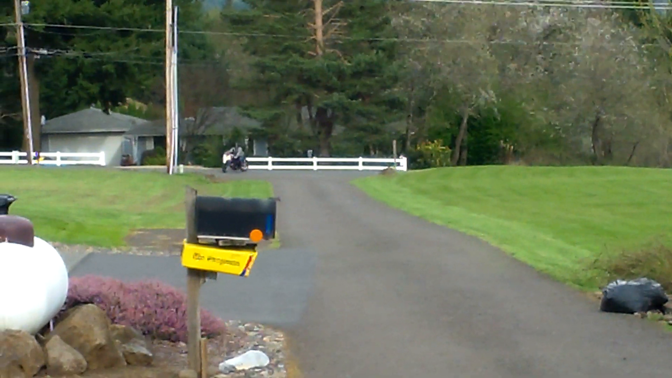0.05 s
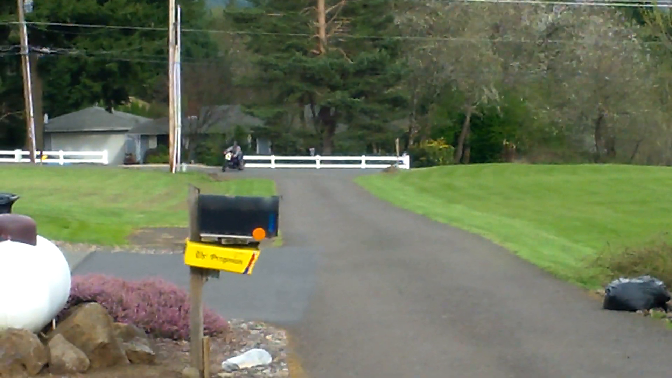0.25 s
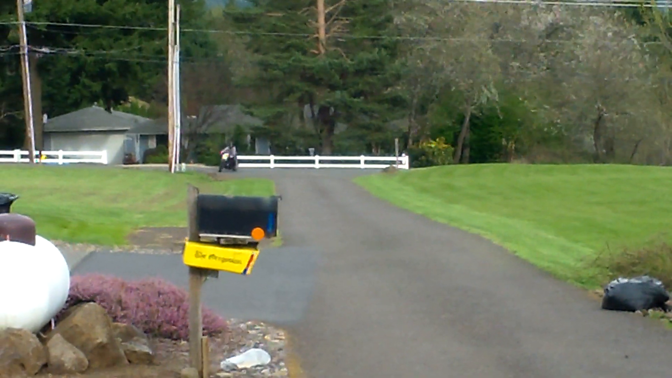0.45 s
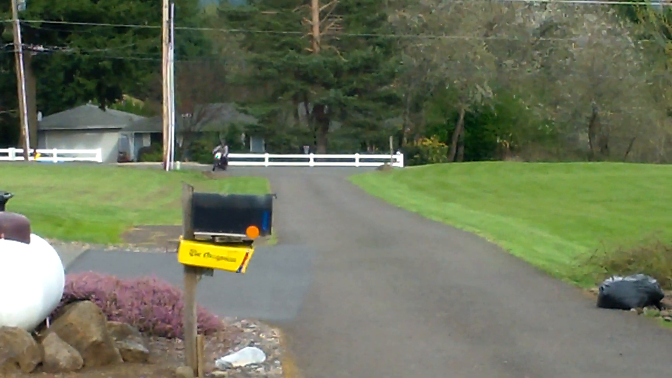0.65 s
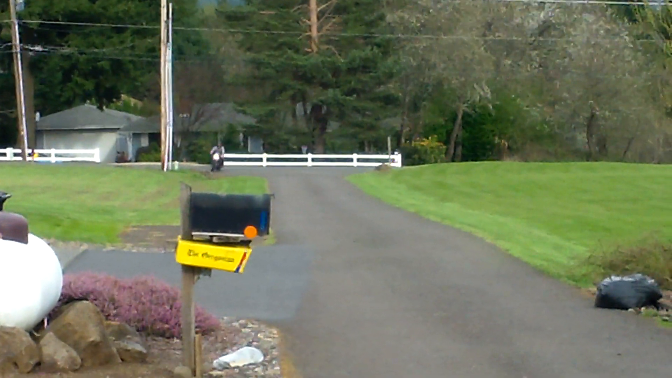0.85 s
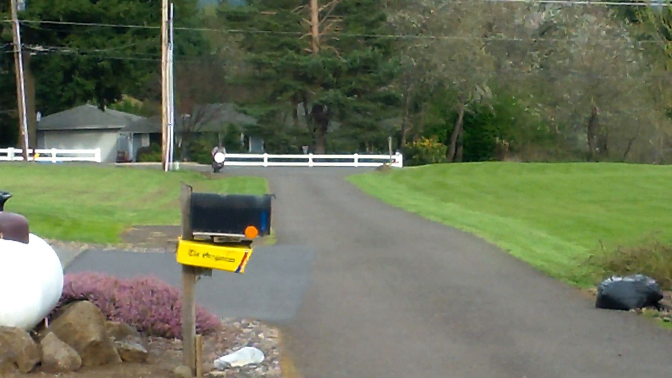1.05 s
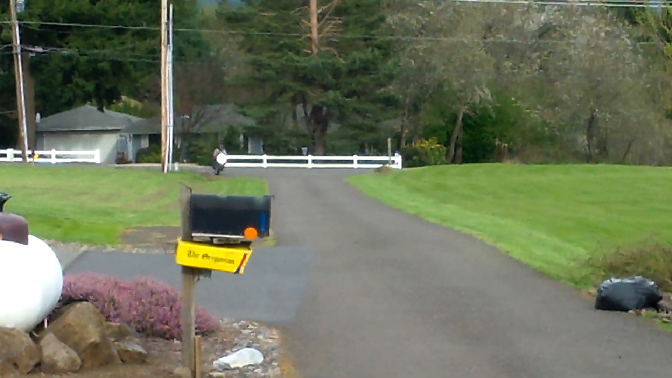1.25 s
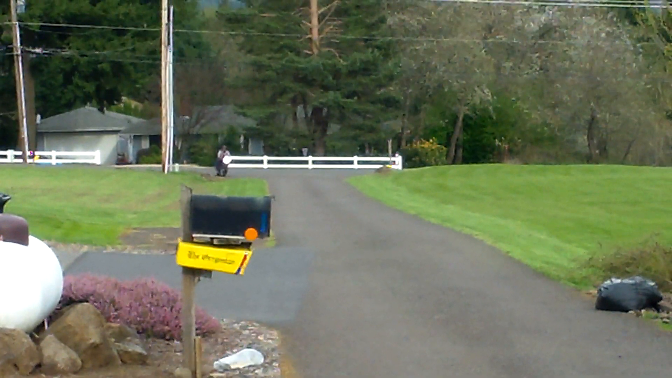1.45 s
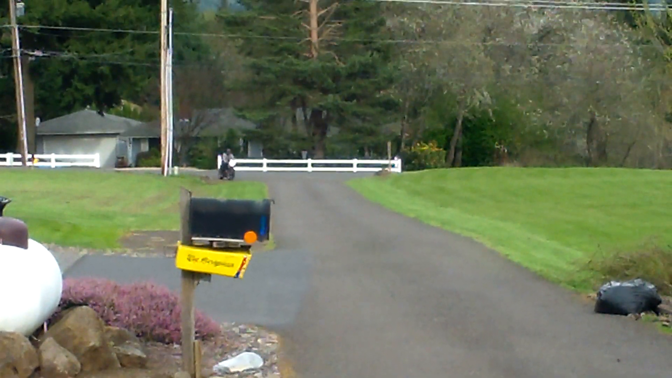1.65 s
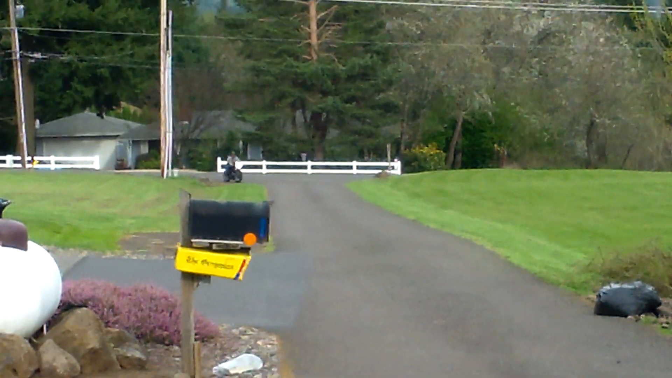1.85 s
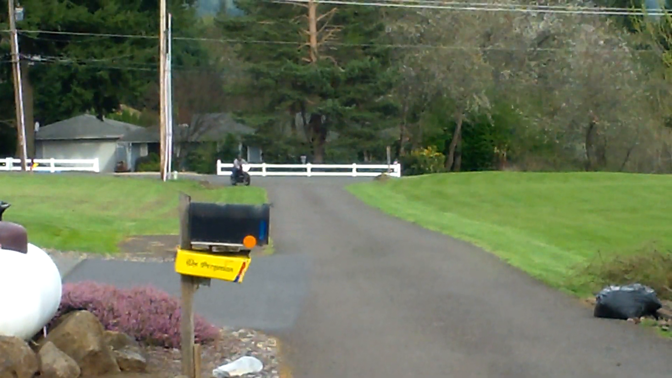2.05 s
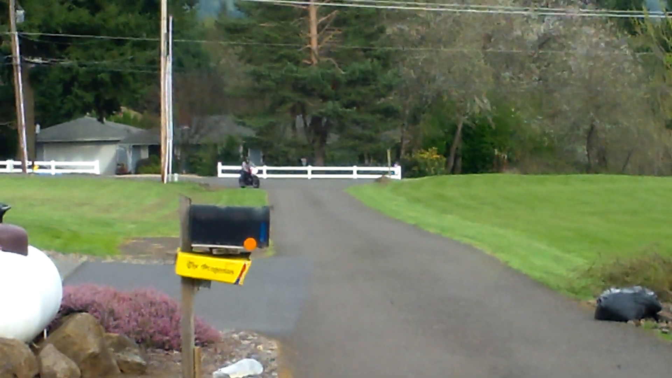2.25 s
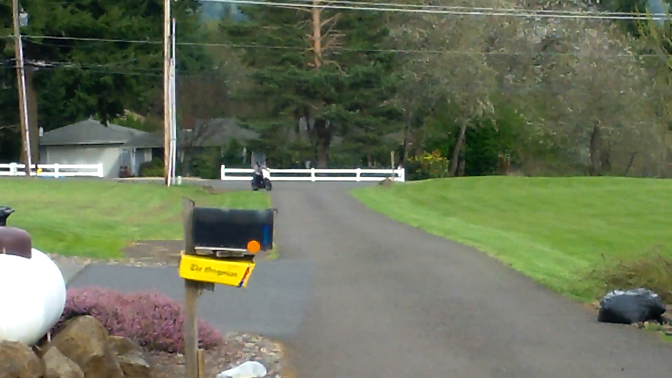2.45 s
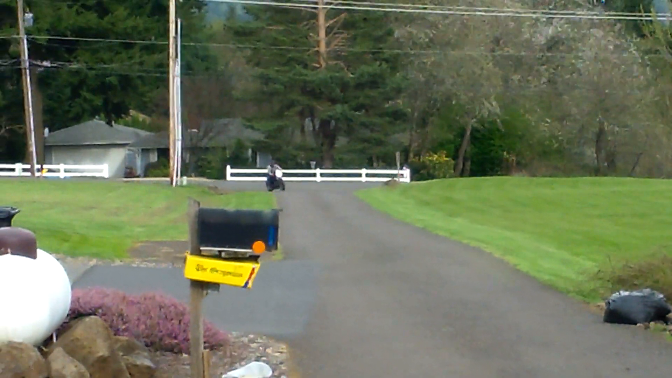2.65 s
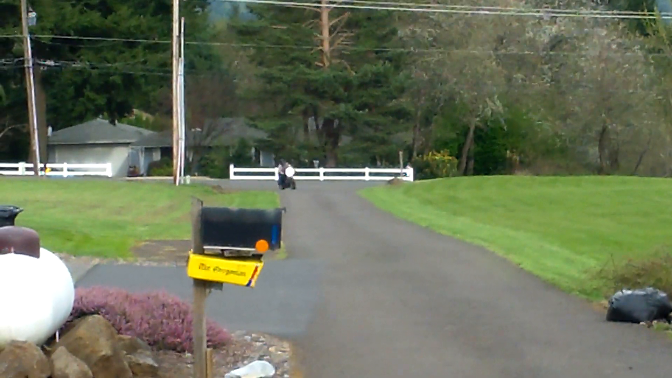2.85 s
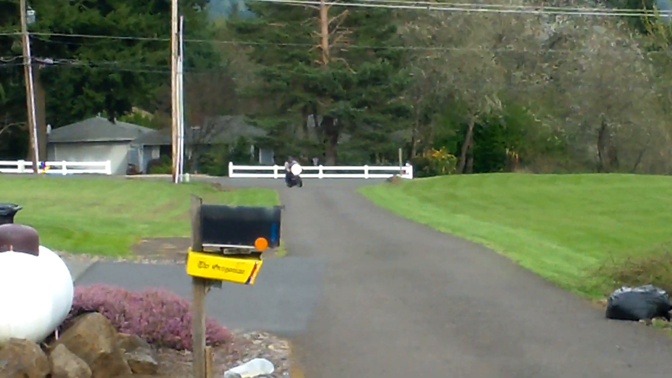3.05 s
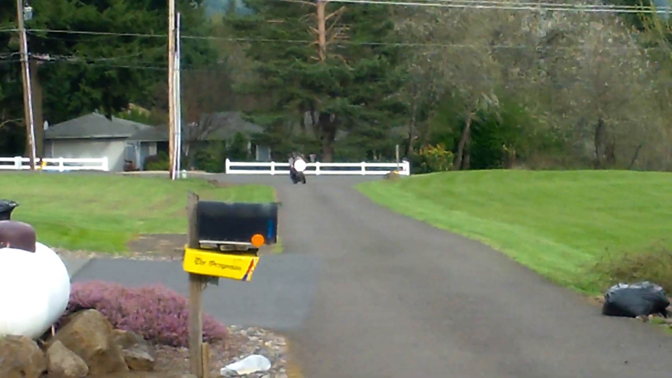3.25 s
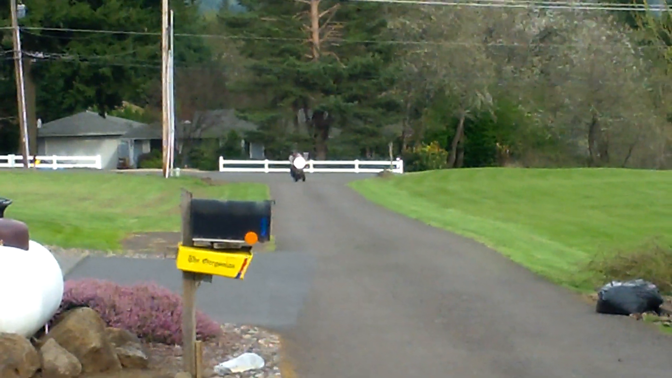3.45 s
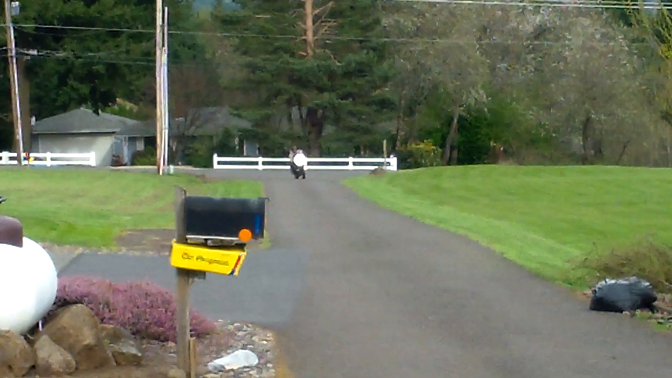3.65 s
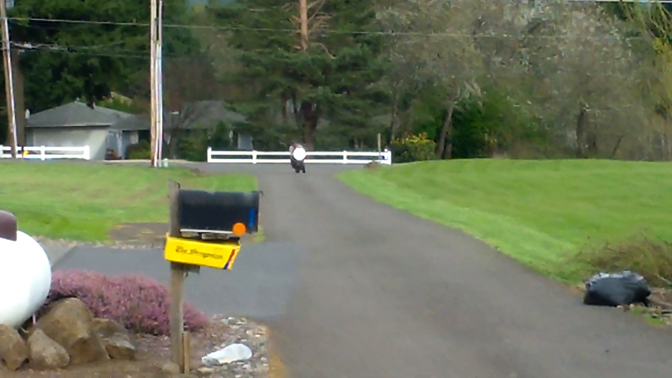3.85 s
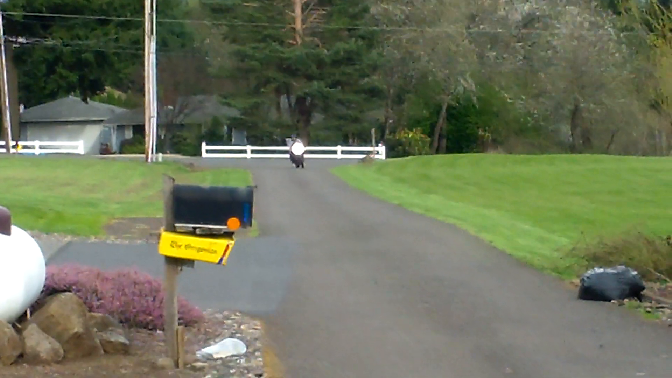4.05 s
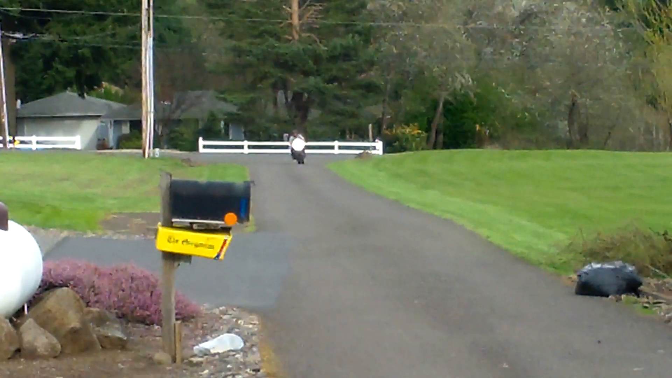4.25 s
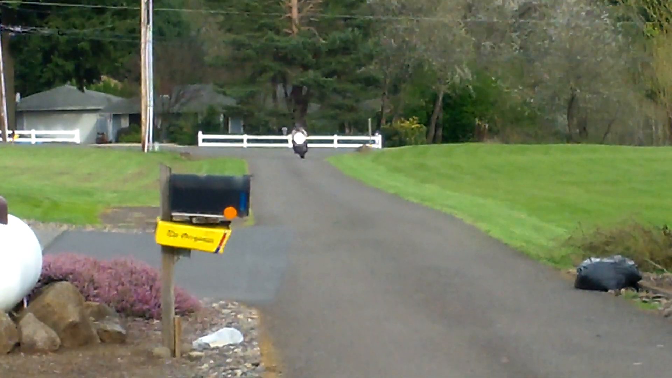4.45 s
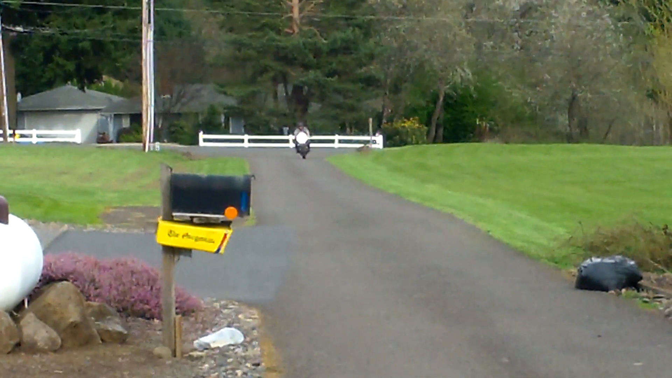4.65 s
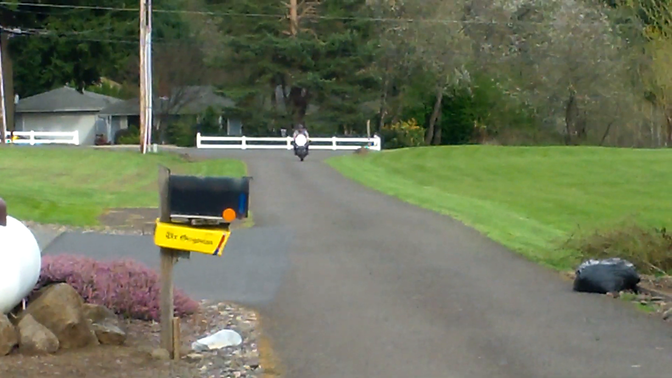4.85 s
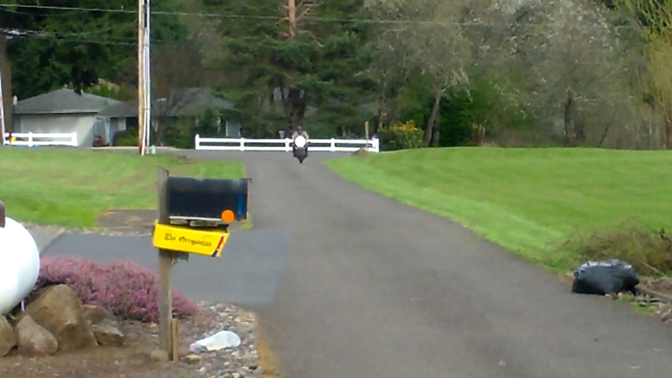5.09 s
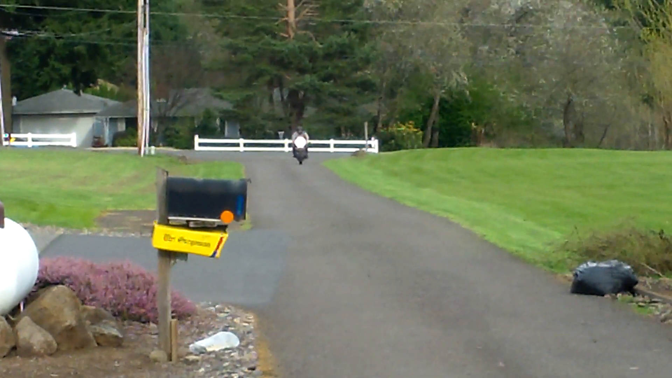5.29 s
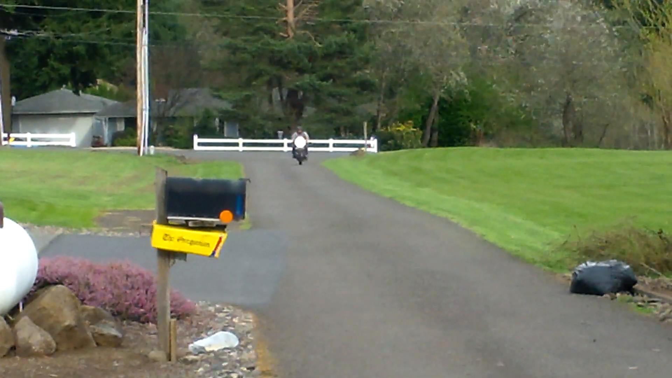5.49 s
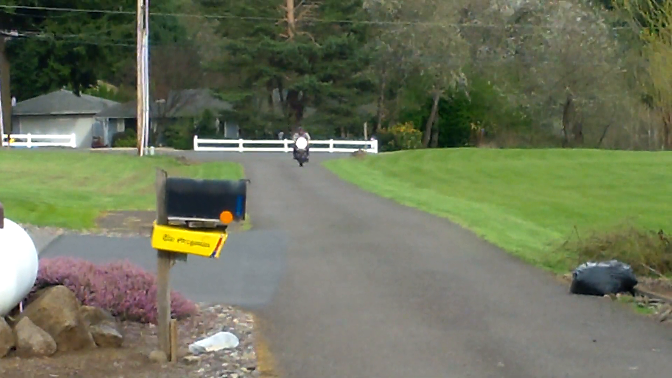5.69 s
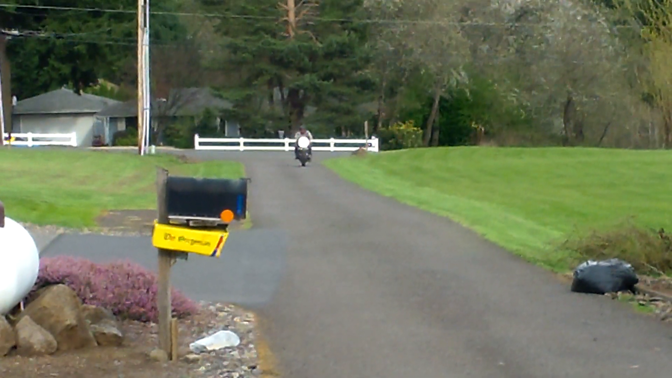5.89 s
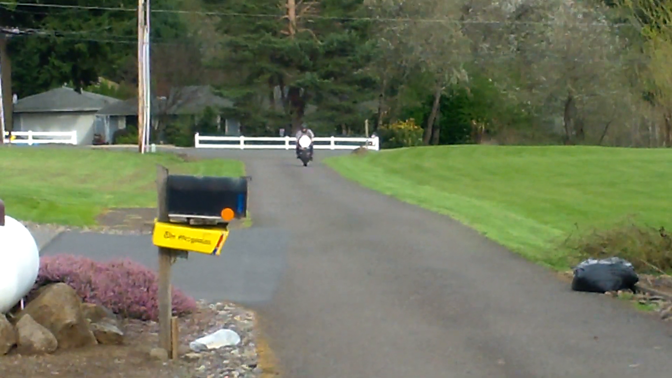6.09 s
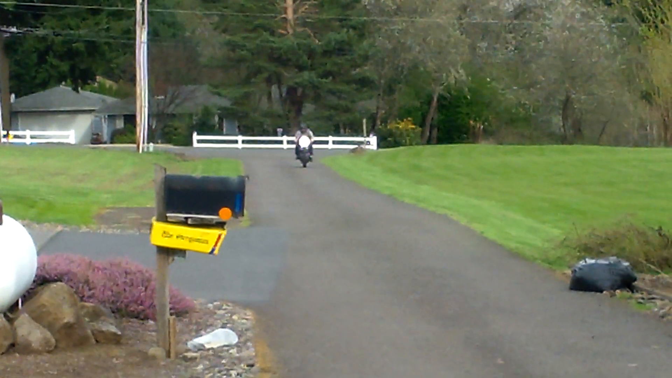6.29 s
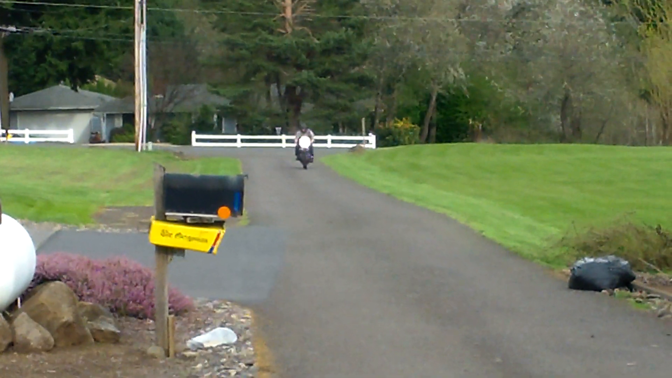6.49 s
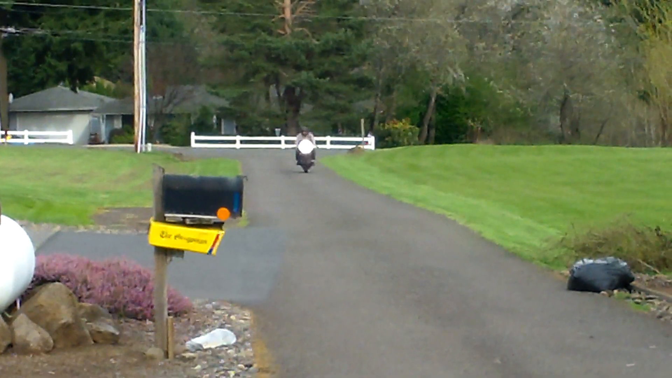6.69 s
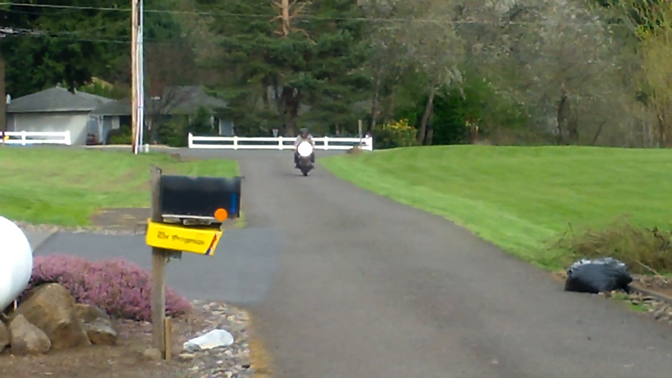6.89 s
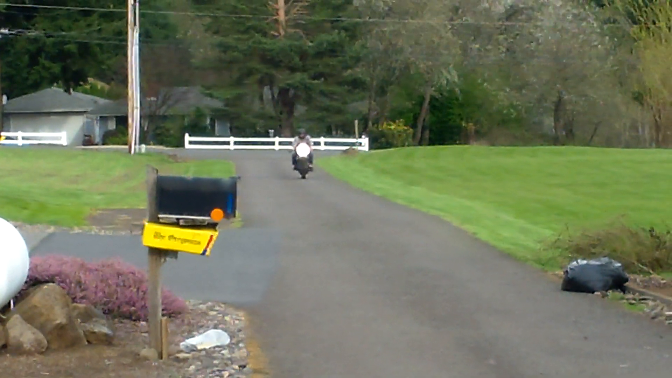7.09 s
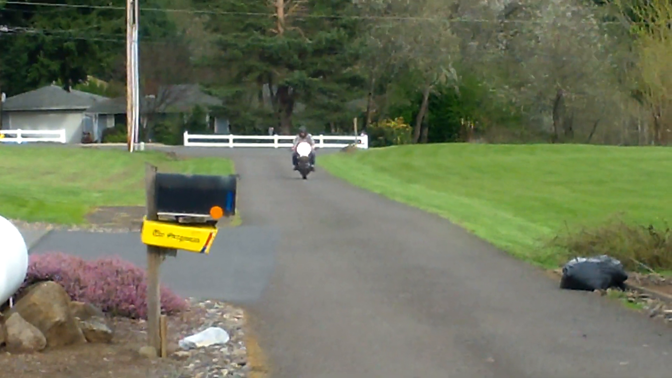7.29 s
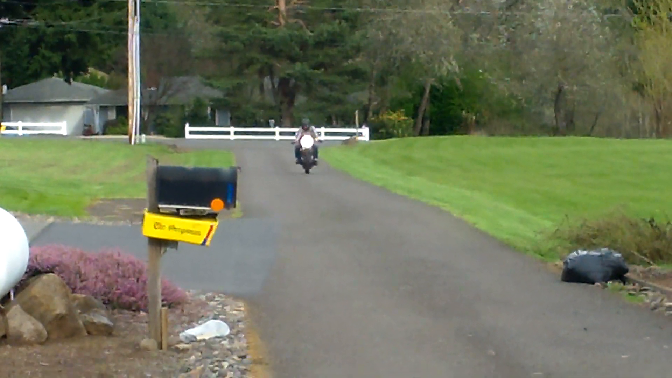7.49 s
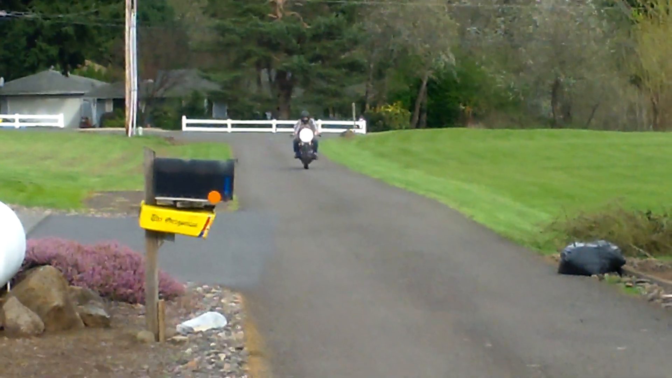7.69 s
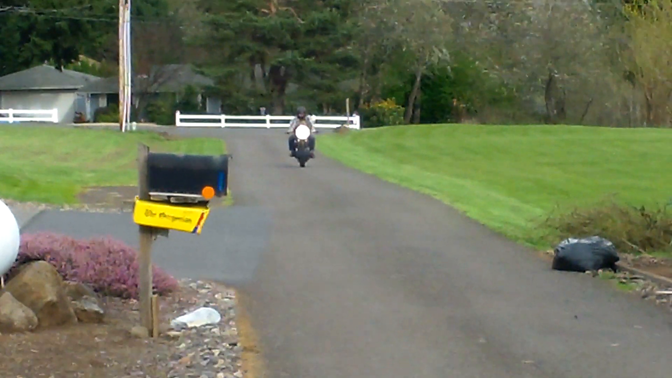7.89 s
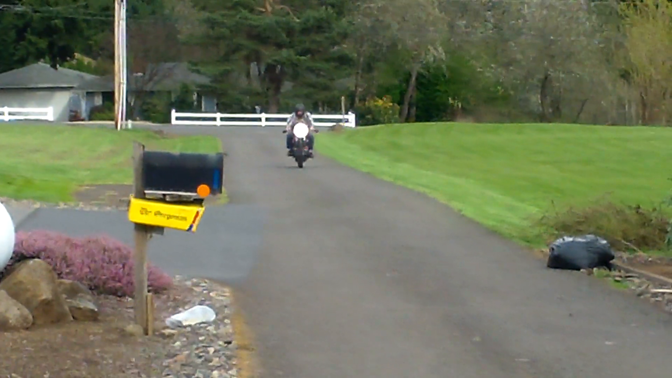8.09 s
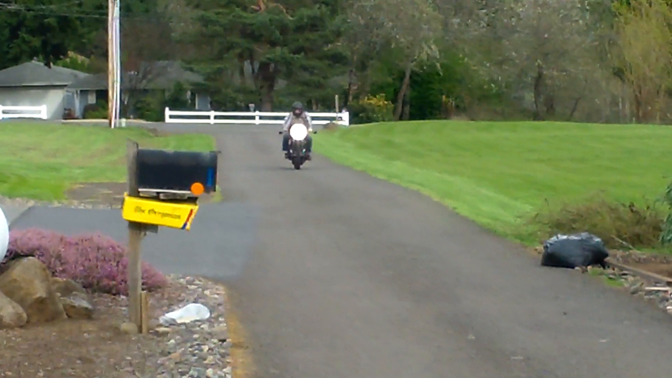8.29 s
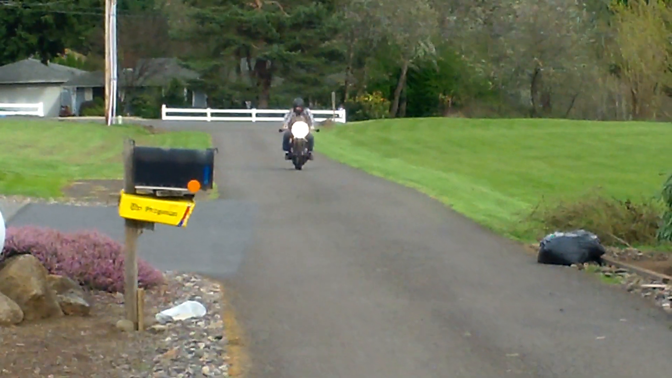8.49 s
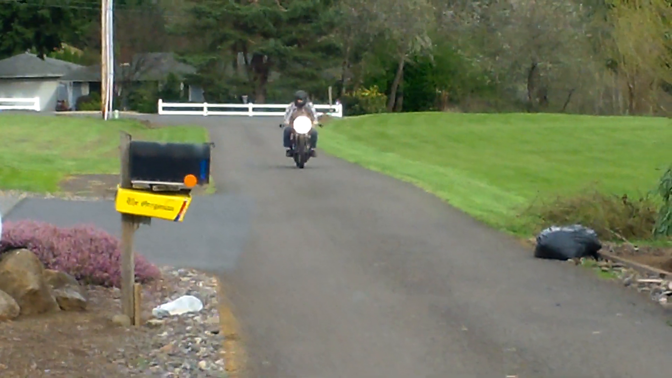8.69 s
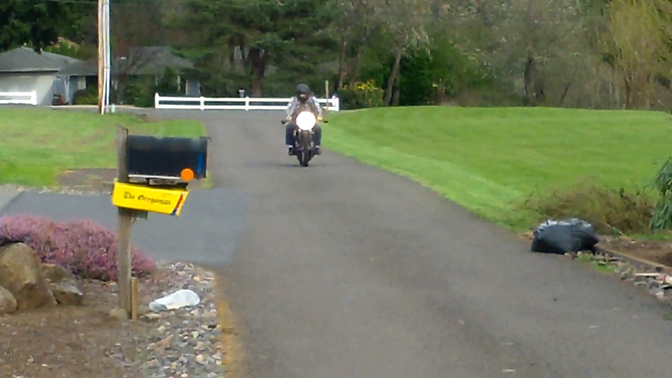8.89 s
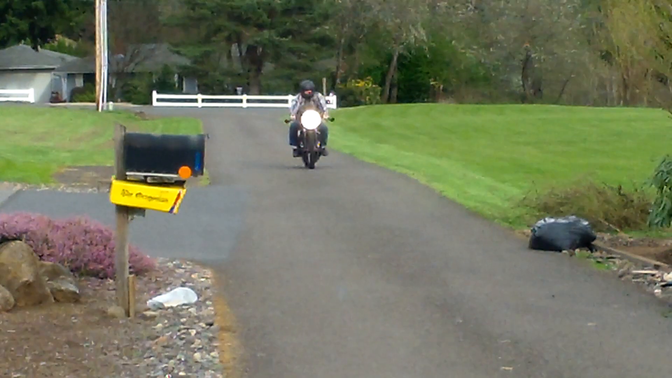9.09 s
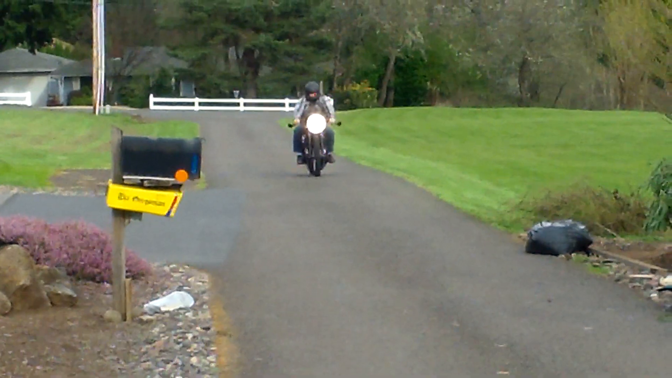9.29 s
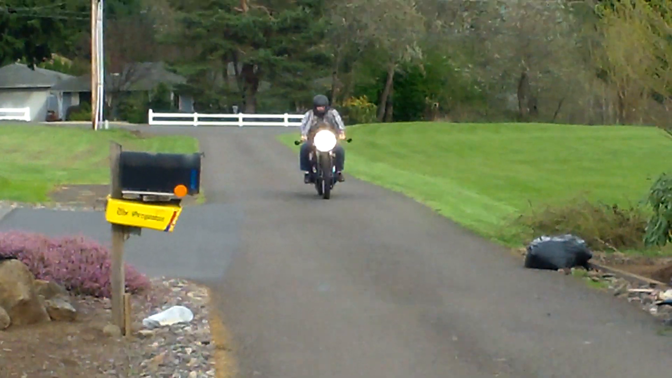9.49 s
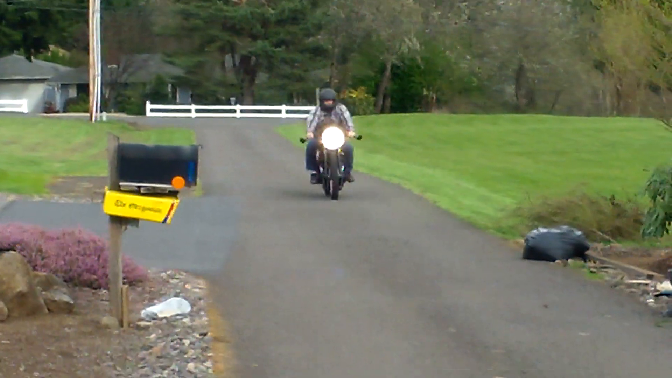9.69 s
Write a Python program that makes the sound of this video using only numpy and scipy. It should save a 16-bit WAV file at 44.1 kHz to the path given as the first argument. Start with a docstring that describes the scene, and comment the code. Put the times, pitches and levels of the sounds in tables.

```python
"""A country driveway: a four-cylinder motorcycle rounds a far bend, pulls up the drive, shifts up, pulls again
and rolls off the throttle. Sine lines at multiples of its firing cycle, shaped by resonances, make the exhaust;
toothed gears whine as sine tones, and coloured noise makes the gas rush, valve rattle and chain sizzle.
Filtered noise makes the quiet yard and the wind; impulses ring small ticks.
A last blast of air on the microphone makes a limiter duck everything under the hiss."""
import sys
import numpy as np
from scipy import signal
from scipy.fft import rfft, irfft, next_fast_len
from scipy.io import wavfile
from scipy.ndimage import uniform_filter1d

SR = 44100
rng = np.random.default_rng(int(sys.argv[2]) if len(sys.argv) > 2 else 0)


def bounce(signal):
    """Save signal as a 16-bit WAV file at the path given by the first command-line argument."""
    frames = np.transpose(np.atleast_2d(signal))
    limited = np.clip(frames, -1, 1)
    pcm = np.round(limited * 32767).astype(np.int16)
    wavfile.write(sys.argv[1], SR, pcm)


N = 429534
STEP = 128  # samples per control frame
T = np.arange(N) / SR
FRAMES = np.arange(0, N + STEP, STEP) / SR

# Colour of the quiet yard. Each row: frequency in Hz, density in relative dB per Hz.
YARD_SPECTRUM = [(59, -15), (100, 5.5), (133, -4.5), (183, -10.5), (266, -9), (461, -27), (658, -20),
                 (1410, -31), (2240, -49), (4490, -21.5), (5760, -36.5), (7000, -43), (9100, -76),
                 (15400, -120)]
# Wind on the microphone. Each row: time in seconds, level in dB before the breeze trim.
BREEZE_LEVEL = [(0, -44.5), (1.7, -48.5), (2.3, -46), (3.4, -44), (3.85, -36.5), (4.2, -40), (5.2, -40.5),
                (7.8, -44.5), (8.4, -54), (9.4, -41)]
# Gusts. Each row: centre in seconds, 1/e half-length in seconds, level at the centre in dB.
GUSTS = [(2.31, 0.023, -33), (3.81, 0.05, -36.5), (5.696, .025, -29), (5.96, 0.025, -20),
         (6.086, 0.07, -23.5), (6.852, 0.042, -37), (9.408, 0.037, -37)]
# Colours of the steady wind and of the gusts. Each row: frequency in Hz, density in relative dB per Hz.
WIND_SPECTRUM = [(8, 5), (25, 2), (50, -3.5), (100, -10), (200, -28), (400, -56.5)]
GUST_SPECTRUM = [(15, -1.5), (50, 2), (100, 3), (160, -7.5), (300, -32), (600, -70)]
# Colour of the eddies in the blast. Each row: frequency in Hz, density in relative dB per Hz.
EDDY_SPECTRUM = [(6, 14), (20, 2), (50, -29), (120, -23), (400, -57), (2000, -100)]
# Small ticks close by. Each row: start in seconds, strength in relative dB.
TICKS = [(0.63, -36), (1.533, -46), (2.670, -46), (2.845, -56), (9.475, -22)]
# Ringing modes of the ticks. Each row: frequency in Hz, level in relative dB, 60 dB decay time in seconds.
TICK_MODES = [(3400, -26, .005), (4240, 13, 0.0061), (4500, -22, .004)]
# Hiss level. Each row: time in seconds, level in dB ahead of the top cut.
HISS_LEVEL = [(0, -60.5), (5.9, -60.5), (6.7, -67), (7.6, -63.5), (8.3, -65), (9.2, -61), (9.74, -65)]
# Hiss colour. Each row: frequency in Hz, density in relative dB per Hz.
HISS_SPECTRUM = [(1000, -0.093), (7000, 0), (11000, -0.74), (14000, 1), (16000, 0.083)]

# Engine speed through the bend, the first pull, the upshift with the second pull, and the roll-off.
# Each row: time in seconds, firing rate in firings per second.
BEND_RATE = [(0.0, 64.5), (0.37, 45.5), (0.46, 47.4), (0.8, 70), (0.97, 73.0), (1.2, 74.7), (1.52, 70.7),
             (2.03, 69.3), (2.35, 63.3)]
FIRST_PULL_RATE = [(2.55, 73), (2.65, 68.8), (3.26, 84.3), (3.53, 88), (4.69, 131.5), (4.98, 145.6),
                   (5.97, 190), (6.83, 255.4), (7.02, 269)]
SECOND_PULL_RATE = [(7.05, 263.0), (7.134, 232.9), (7.246, 209), (7.298, 196), (7.31, 185.1),
                    (7.398, 183.0), (8.048, 204.0), (8.364, 218.0), (8.49, 211)]
ROLL_OFF_RATE = [(8.54, 206), (8.564, 187.3), (8.632, 190), (8.704, 198.7), (8.788, 199), (9.12, 186.4),
                 (9.324, 179), (9.62, 164.6)]
# The rider shuts the throttle for the upshift and the roll-off. Each row: start in seconds, length in seconds.
LIFT_OFFS = [(7.027, 0.28), (8.492, 1.5)]
# Engine layers. Each row: time in seconds, then bark, rasp and clatter levels in dB before their trims.
BAND_LEVELS = [(0.0, -64.5, -61, -61.5), (1.29, -66, -67, -55), (2.47, -69, -89, -55),
               (3.87, -44.5, -58.5, -49), (5.06, -39, -41.5, -41), (5.13, -43, -36.5, -37.5),
               (5.37, -30.5, -33, -38), (6.14, -33.5, -33, -39), (6.43, -28, -27, -34.5),
               (6.98, -35.5, -27.5, -30.5), (7.03, -28.5, -39, -36), (7.22, -34, -39, -36),
               (7.43, -29, -33.5, -37), (8.38, -28.5, -31, -37.5), (8.51, -35.5, -43, -43.5),
               (8.77, -33, -39, -37.5), (9.17, -31, -37, -37), (9.46, -36.5, -39.5, -39)]
# Colour of the drive line's knock. Each row: frequency in Hz, density in relative dB per Hz.
KNOCK_SPECTRUM = [(60, -10), (250, 2), (700, 0), (1500, -12), (5000, -43)]
# Chain sizzle. Each row: time in seconds, level in dB.
CHAIN_LEVEL = [(0, -85), (5.8, -85), (6.8, -63), (7.2, -89), (8.4, -64.5), (8.8, -53.5), (9.2, -50.5),
               (9.74, -50)]
# Colours of the chain sizzle, engine covers, valve clatter and gas rush.
# Each row: frequency in Hz, density in relative dB per Hz.
CHAIN_SPECTRUM = [(5000, -4), (7500, -8), (8400, -1.5), (9400, -12), (11000, -17), (14000, -33)]
COVER_SPECTRUM = [(2000, -52), (3050, -31), (3200, 3.5), (3350, -8), (3700, -37), (4400, -2), (5300, -4),
                  (6500, -33), (12000, -61)]
CLATTER_SPECTRUM = [(880, -4), (1500, -11), (1630, -5), (2120, -6.5), (2460, -1.5), (2730, -2), (3320, -1),
                    (3890, -2.5), (4520, 3), (5760, -18.5), (6630, -28.5), (7490, -29), (8300, -26),
                    (10400, -40), (14000, -48)]
RUSH_SPECTRUM = [(150, -4.5), (300, -5.5), (500, -18.5), (710, 1.5), (900, -5), (1170, 10.5), (1450, -1),
                 (1700, 8), (2200, 2), (3500, -33.5)]
# The tooth-mesh tone and its two overtones, each as a multiple of the firing rate.
GEAR_MULTIPLES = (29, 43.5, 58)
# Resonances of the gear case. Each row: frequency in Hz, gain in dB before tone offsets and flutter.
GEAR_CASE = [(1500, -71), (2000, -76.5), (2300, -58.5), (2560, -54), (2900, -68), (3250, -45), (3550, -55),
             (3950, -48.5), (4150, -42), (4480, -42.5), (4750, -53), (5400, -62.5), (6000, -67),
             (6800, -105)]
# The drive goes slack and rings.
# Each row: centre in seconds, 1/e half-length in seconds, mesh tone change in dB, overtone change in dB.
SLACKS = [(1.25, 0.24, -3, 6.5), (8.85, 0.2, 11, 0)]
# Exhaust pipe resonances with the throttle open.
# Each row: centre in Hz before the pitch shift, -6 dB width in Hz, gain in relative dB.
PIPE_RESONANCES = [(110, 280, -5), (335, 88, 2.5), (660.5, 152, 1.5), (1230, 420, -6.5), (1750, 209, 2),
                   (2295, 370, -7), (3460, 730, -17), (4600, 910, -21.5)]
# Shift of the pipe's resonances with gas heat and approach. Each row: time in seconds, shift in percent.
PIPE_SHIFT = [(3, -2.5), (5.5, -2.5), (6.8, 0.5), (7.4, -0.5), (8.3, 2), (9.5, -10)]
# Soft exhaust tone, weighted in as the throttle shuts. Each row: frequency in Hz, full-weight gain in dB.
COASTING_TONE = [(100, -5), (640, 6), (800, -3.5), (1000, -11), (1220, -5.5), (1600, -9.5), (2600, -13.5),
                 (4000, -23)]
# Unequal cylinders leave half- and quarter-order lines between the firing orders.
# Each row: frequency in Hz, gain in relative dB.
HALF_ORDERS = [(100, 4), (400, -8), (700, -5.5), (1500, -3.5), (4000, -3.5)]
QUARTER_ORDERS = [(100, -18.5), (400, -20.5), (700, -15), (1500, -7), (4000, -13)]
# Low orders boom as they slide through resonances, under load and with the throttle shut.
# Each row: multiple of the firing rate, centre in Hz, -6 dB width in Hz,
# peak level in dB at the reference distance before flutter and fades.
LOAD_BOOMS = [(.5, 120, 130, -47.5), (1, 95.8, 41, -26.5), (1, 135, 77, -29), (1, 199, 30, -31),
              (1, 230, 50, -37), (1, 257, 47, -32), (1.5, 91.2, 50, -59), (1.5, 180, 160, -53),
              (1.5, 323.4, 58, -43), (2, 100.6, 74, -33.5), (2, 329, 125, -30), (2, 393, 20.5, -34.5),
              (2, 507, 164, -39), (3, 256, 90, -43), (3, 367, 114, -44), (3, 580, 170, -39.5),
              (3, 676, 143, -30.5), (4, 265, 64, -45.5), (4, 510, 320, -51.5), (4, 674.5, 132, -30),
              (4, 908, 55, -45), (4, 1070, 110, -34.5), (5, 254, 280, -56), (5, 641, 110, -39.5),
              (5, 883, 74, -43), (5, 1030, 90, -41.5), (5, 1163, 150, -33), (5, 1300, 115, -37.5)]
COAST_BOOMS = [(.5, 101, 16, -40.5), (1, 206, 140, -28), (1.5, 250, 27, -39.5), (1.5, 274, 24, -33.5),
               (1.5, 287, 62, -41.5), (2, 377, 105, -49), (3, 513, 67, -48.5), (3, 609, 80, -40.5),
               (3, 696, 155, -42), (4, 735, 140, -50.5), (5, 944, 150, -52)]
# Brief level changes of single low orders.
# Each row: centre in seconds, 1/e half-length in seconds, multiple of the firing rate, change in dB.
FADES = [(0.02, 0.17, 2, -7), (0.36, 0.18, 1, 2), (7.244, 0.052, 1, -7), (7.794, 0.037, 1, -15),
         (8.373, 0.15, 3, -5.5), (9.133, 0.14, 1, -12)]

THROTTLE_MOVE_S, SHUT_OPENING = 0.022, 0.45  # time to shut or reopen; what stays open, 0-1
EASE_S = 0.053  # the low orders drop to half load this long before each shutting of the throttle
BEND_M, LEAVES_BEND_S, SPEED_M_PER_S = 77.6, 2.56, 8.5  # distance of the bend, start and speed of the approach
REFERENCE_M = 42  # distance at which boom levels hold
RASP_FROM_HZ, RASP_DB_PER_OCTAVE = 133, 34  # below this firing rate the pulses are too soft to rasp


def from_db(db):
    """Decibels to gain."""
    return 10 ** (np.asarray(db) / 20)


def rms_one(x):
    """Scale to rms 1."""
    return x / np.sqrt(np.mean(x ** 2) + 1e-20)


def in_time(rows, times):
    """The columns of a curve table at the given times."""
    seconds, *columns = np.transpose(rows)
    return [np.interp(times, seconds, column) for column in columns]


def at_hz(points, hz):
    """A spectrum's dB at the given frequencies, interpolated over log frequency."""
    points = np.array(points)
    return np.interp(np.log(hz + 1e-9), np.log(points[:, 0]), points[:, 1])


def per_sample(control):
    """From control frames to samples."""
    return np.interp(T, FRAMES, control)


def bump(times, centre_s, length_s):
    """A bell-shaped swell, 1 at its centre."""
    return np.exp(-((times - centre_s) / length_s) ** 2)


def drift(rate_hz):
    """Slow random wander on the control frames, rms 1."""
    pole = np.exp(-2 * np.pi * rate_hz * STEP / SR)
    chance = rng.standard_normal(2 * len(FRAMES))
    wander = signal.lfilter([1], [1, -2 * pole, pole * pole], chance)
    return rms_one(wander[len(FRAMES):])  # skip the filter's warm-up


def noise(spectrum):
    """Noise of the given colour, rms 1."""
    size = next_fast_len(N)
    gain = from_db(at_hz(spectrum, np.arange(size // 2 + 1) * SR / size))
    return rms_one(irfft(rfft(rng.standard_normal(size)) * gain, size)[:N])


def puffs(turns, depth):
    """A swell once in every turn, rms 1."""
    return rms_one(np.exp(depth * np.cos(2 * np.pi * turns)))


def yard(level_db):
    """The quiet yard is a steady bed of coloured noise."""
    return from_db(level_db) * noise(YARD_SPECTRUM)


def wind(breeze_trim_db):
    """Low lumps of air on the microphone, brighter in the gusts."""
    breeze_db, = in_time(BREEZE_LEVEL, T)
    breeze = from_db(breeze_db + breeze_trim_db) * noise(WIND_SPECTRUM)
    gust_gain = sum(from_db(db) * bump(T, s, length) for s, length, db in GUSTS)
    return breeze + gust_gain * noise(GUST_SPECTRUM)


def blast(start_s, swing_db, rise_s, eddy_db, swing_hz):
    """A sudden blast of air: a steep front, then slow pressure swings with eddies."""
    age = np.maximum(T - start_s, 0)
    front = 1 - np.exp(-(age / rise_s) ** 2)
    eddies = from_db(eddy_db) * noise(EDDY_SPECTRUM)  # relative to the swing
    swing = -np.cos(2 * np.pi * swing_hz * age)
    return from_db(swing_db) * front * (eddies + swing)


def ticks(level_db):
    """Each tick is an impulse that rings a small shell's modes for a few milliseconds."""
    clicks, ringing = np.zeros(N) + 1e-18, np.zeros(N)
    for s, db in TICKS:
        clicks[round(s * SR)] = from_db(db + level_db)
    for hz, db, t60 in TICK_MODES:
        pole = from_db(-60 / (t60 * SR))
        w = 2 * np.pi * hz / SR
        feedback = [1, -2 * pole * np.cos(w), pole * pole]
        ringing += from_db(db) * signal.lfilter([0, np.sin(w)], feedback, clicks)
    band = signal.butter(3, [2900, 4800], "band", fs=SR, output="sos")
    return signal.sosfilt(band, ringing)


def throttle_shut(times):
    """0 while the engine pulls, 1 while the rider lifts off, with a short ramp at each move."""
    shut = 0
    for s, length in LIFT_OFFS:
        closing = np.clip((times - s) / THROTTLE_MOVE_S, 0, 1)
        reopening = np.clip((times - s - length) / THROTTLE_MOVE_S, 0, 1)
        shut = shut + closing - reopening
    return shut


def throttle_opening(times):
    """The throttle's opening, 0-1; some stays open when it is shut."""
    return np.clip(1 - (1 - SHUT_OPENING) * throttle_shut(times), 0, 1)


def drive_line_knock(start_s, level_db, decay_s):
    """The drive line knocks as the throttle snaps shut: a noise burst with exponential decay."""
    age = np.maximum(T - start_s, 0)
    envelope = (T > start_s) * np.exp(-age / decay_s)
    return from_db(level_db) * envelope * noise(KNOCK_SPECTRUM)


def chain():
    """The drive chain sizzles: high noise that follows a level curve."""
    chain_db, = in_time(CHAIN_LEVEL, T)
    return from_db(chain_db) * noise(CHAIN_SPECTRUM)


def gas_and_valves(firings, rush_db, valve_db, loaded_db, cover_db, rush_depth, valve_depth):
    """Gas rushes out with each firing; valves and covers rattle with the crank, the valves less under load."""
    bark_db, _, clatter_db = in_time(BAND_LEVELS, T)
    crank_turns = firings / 2  # four cylinders fire twice a turn
    rush = from_db(bark_db + rush_db) * noise(RUSH_SPECTRUM) * puffs(firings, rush_depth)
    load_db = loaded_db * throttle_opening(T) ** 2
    flutter_db = per_sample(0.71 * drift(40))
    clatter = from_db(clatter_db + valve_db + load_db + flutter_db) * noise(CLATTER_SPECTRUM)
    cover = from_db(cover_db) * noise(COVER_SPECTRUM) * puffs(crank_turns, 0.64)
    return rush + cover + clatter * puffs(crank_turns, valve_depth)


def gears(rate, firings, mesh_smear, overtone_smear, half_order_db, overtone_db):
    """A thin tooth-mesh tone with overtones blurred by backlash; all swell with each firing."""
    mesh_db, slack_db = sum(np.outer(dbs, bump(FRAMES, s, length)) for s, length, *dbs in SLACKS)
    levels_db = (mesh_db, half_order_db + slack_db, overtone_db + slack_db)
    smears = (mesh_smear, overtone_smear, overtone_smear)  # phase wander in cycles
    whine = np.zeros(N)
    for multiple, db, smear in zip(GEAR_MULTIPLES, levels_db, smears):
        gain = from_db(db + at_hz(GEAR_CASE, multiple * rate) + 3.0 * drift(21))
        cycles = multiple * firings + per_sample(smear * drift(32))
        whine += per_sample(gain) * np.sin(2 * np.pi * cycles)
    return np.sqrt(2) * whine * puffs(firings, 0.46)


def nearness(times):
    """Gain of the approaching bike: one over its distance, relative to the reference distance."""
    distance_m = BEND_M - SPEED_M_PER_S * np.maximum(times - LEAVES_BEND_S, 0)
    return REFERENCE_M / np.maximum(distance_m, 2)


def boom_swell(table, multiple, rate):
    """A low order swells as it slides through its resonances, which add in power."""
    power = 0
    for m, hz, width, db in table:
        if round(2 * m) == 2 * multiple:
            off_centre = 2 * (multiple * rate - hz) / width
            power = power + from_db(db - 6 * off_centre ** 2) ** 2
    return np.sqrt(power)


def boom(multiple, rate):
    """Gain of one low order: it swells in resonances, changes with the throttle and grows as the bike nears."""
    shut = throttle_shut(FRAMES)
    load = 1 - np.maximum(shut, throttle_shut(FRAMES + EASE_S) / 2)
    fade_db = sum(db * bump(FRAMES, s, length) for s, length, m, db in FADES if round(m) == multiple)
    swell = load * boom_swell(LOAD_BOOMS, multiple, rate) + shut * boom_swell(COAST_BOOMS, multiple, rate)
    return swell * nearness(FRAMES) * from_db(fade_db)


def pipe_gain(hz):
    """The exhaust's response: steep-sided resonances added in power."""
    power = 0
    for centre, width, db in PIPE_RESONANCES:
        power = power + (from_db(db) / (1 + (2 * (hz - centre) / width) ** 2)) ** 2
    return np.sqrt(power)


def exhaust_gains(rate, order, bark_trim_db, rasp_trim_db, shut_db):
    """Pipe resonances colour the lines; the middle ones bark and the upper ones rasp."""
    opening = throttle_opening(FRAMES)
    hz = order * rate / 4
    between_db = np.where(order % 2, at_hz(QUARTER_ORDERS, hz), at_hz(HALF_ORDERS, hz))
    uneven_db = between_db * (order % 4 > 0)  # every fourth line is a firing order
    # an open throttle brings out the pipe's resonances in full
    shift_percent, = in_time(PIPE_SHIFT, FRAMES)
    resonance = pipe_gain(hz / (1 + shift_percent / 100)) ** opening
    gain = resonance * from_db((1 - opening) * at_hz(COASTING_TONE, hz) + uneven_db)
    above_boom = np.clip((hz - 450) / 100, 0, 1)
    upper = np.clip((hz - 1350) / 200, 0, 1)
    bark_db, rasp_db, _ = in_time(BAND_LEVELS, FRAMES)
    soft_db = RASP_DB_PER_OCTAVE * np.minimum(np.log2(rate / RASP_FROM_HZ), 0)
    bark_power = np.sum(above_boom * (1 - upper) * gain ** 2, axis=0)
    rasp_power = np.sum(upper * gain ** 2, axis=0) + 0.37  # the floor keeps weak upper lines weak
    bark = from_db(bark_db + bark_trim_db) / np.sqrt(bark_power)
    rasp = from_db(rasp_db + rasp_trim_db + soft_db + shut_db * (1.5 - opening)) / np.sqrt(rasp_power)
    return gain * (bark * (1 - upper) + rasp * upper)


def exhaust(rate, firings, bark_trim_db, rasp_trim_db, shut_db, boom_flutter_db, flutter_db,
            smear, scatter, count):
    """Lines at every multiple of the four-firing cycle slide through the pipe's resonances."""
    order = np.arange(1, count + 1)[:, None]
    hz = order * rate / 4
    gains = exhaust_gains(rate, order, bark_trim_db, rasp_trim_db, shut_db)
    booming = {round(2 * m) / 2 for m, *_ in LOAD_BOOMS}
    lines = np.zeros(N)
    for k, line in enumerate(gains):
        multiple = (k + 1) / 4
        if multiple in booming:
            line = boom(multiple, rate) * from_db(boom_flutter_db * drift(23))
        else:
            # ground and tree echoes make each line swell and fade
            line = line * from_db(flutter_db * drift(3.6))
        # the silencer scatters the phases; uneven burning smears the higher lines (in cycles)
        wander = scatter * rng.standard_normal() + smear * np.sqrt(hz[k] / 1000) * drift(12)
        cycles = (multiple * firings + per_sample(wander)) % 1
        lines += per_sample(line) * np.sin((2 * np.pi * cycles).astype(np.float32))
    return np.sqrt(2) * lines


def motorcycle():
    """One firing rate drives exhaust, gas, valves and gears; the chain follows its own level curve."""
    rate, = in_time([*BEND_RATE, *FIRST_PULL_RATE, *SECOND_PULL_RATE, *ROLL_OFF_RATE], FRAMES)
    uneven_rate = rate * (1 + 0.001 * drift(14.0))
    firings = np.cumsum(per_sample(uneven_rate)) / SR  # running count
    pipe = exhaust(rate, firings, bark_trim_db=-3.5, rasp_trim_db=1.1, shut_db=-3.0,
                   boom_flutter_db=1.43, flutter_db=3.0, smear=0.044, scatter=0.24, count=100)
    rattle = gas_and_valves(firings, rush_db=-10.0, valve_db=0.6, loaded_db=-1.5, cover_db=-65.5,
                            rush_depth=0.71, valve_depth=0.14)
    whine = gears(rate, firings, mesh_smear=0.19, overtone_smear=0.63,
                  half_order_db=-20.0, overtone_db=-17.0)
    return pipe + rattle + whine + chain()


def scene():
    """The quiet yard, the wind, the ticks and the motorcycle."""
    air = wind(breeze_trim_db=4.5)
    air += blast(start_s=9.476, swing_db=-2.0, rise_s=0.0019, eddy_db=-10.5, swing_hz=9)
    bike = motorcycle() + drive_line_knock(start_s=8.505, level_db=-35.0, decay_s=0.007)
    return (yard(level_db=-48.0) + air + ticks(level_db=3.5) + bike)[None]


def limiter(x, ceiling_db, release_db_per_s):
    """The gain drops within about a millisecond on a peak and recovers slowly."""
    over_db = np.maximum(20 * np.log10(np.abs(x) + 1e-9) - ceiling_db, 0)
    release_db = release_db_per_s * T
    held_db = np.maximum.accumulate(over_db + release_db, axis=-1) - release_db
    return x * from_db(-uniform_filter1d(held_db, size=48))


def record(dry):
    """Limiter, faint hiss and a steep top cut."""
    hiss_db, = in_time(HISS_LEVEL, T)
    hiss = from_db(hiss_db) * noise(HISS_SPECTRUM)
    limited = limiter(dry, ceiling_db=-13.0, release_db_per_s=55.0)
    top_cut = signal.ellip(10, 0.2, 80, 15800, fs=SR, output="sos")  # passes up to 15800 Hz
    return signal.sosfilt(top_cut, limited + hiss)


dry = scene()
out = record(dry)
bounce(out)
```